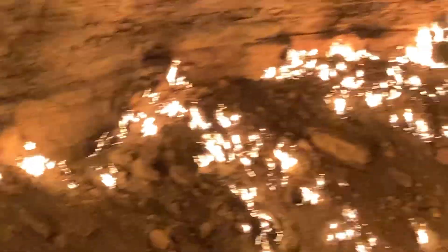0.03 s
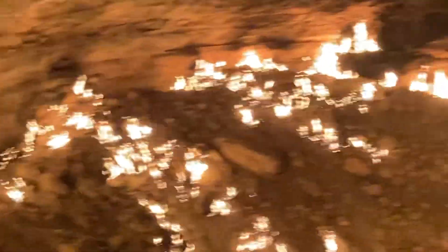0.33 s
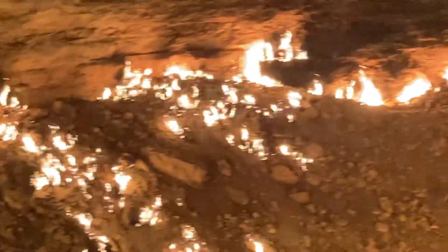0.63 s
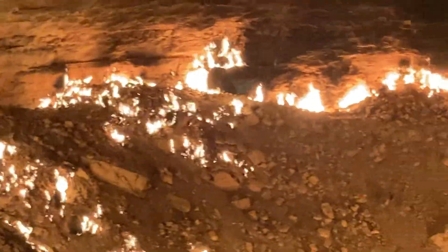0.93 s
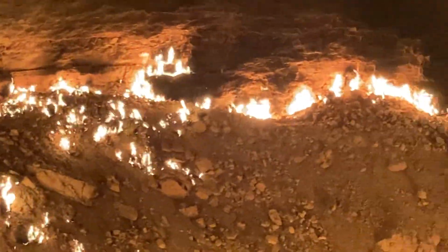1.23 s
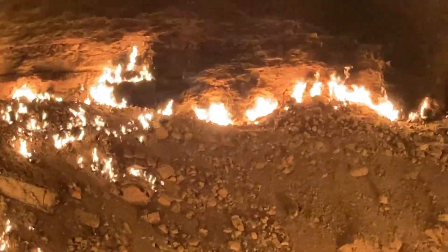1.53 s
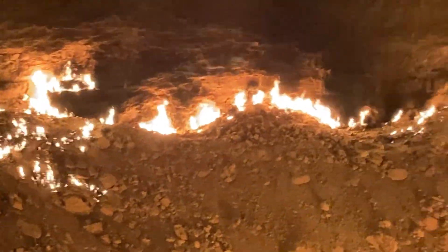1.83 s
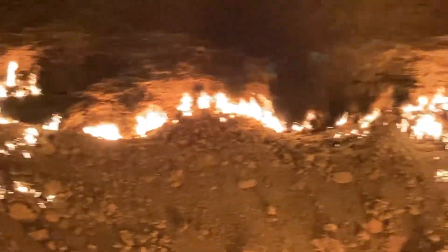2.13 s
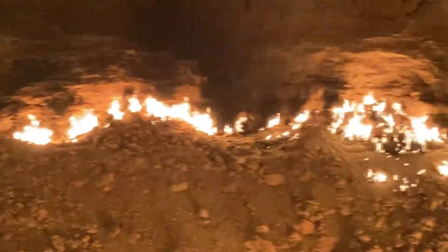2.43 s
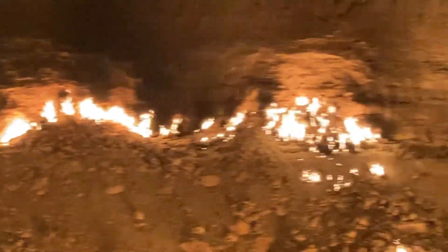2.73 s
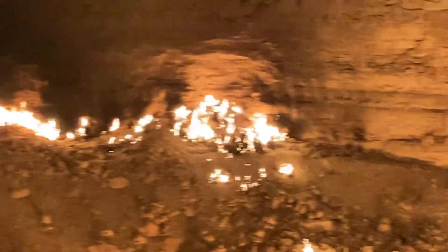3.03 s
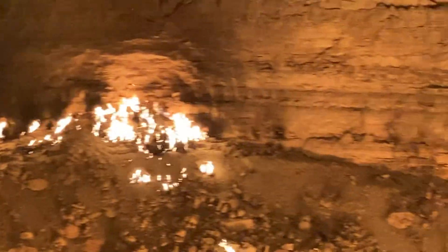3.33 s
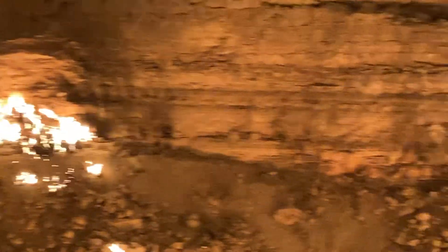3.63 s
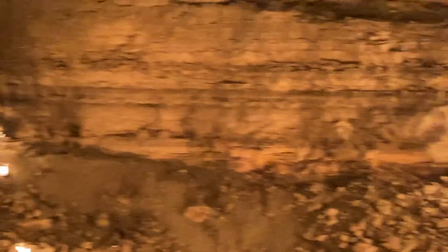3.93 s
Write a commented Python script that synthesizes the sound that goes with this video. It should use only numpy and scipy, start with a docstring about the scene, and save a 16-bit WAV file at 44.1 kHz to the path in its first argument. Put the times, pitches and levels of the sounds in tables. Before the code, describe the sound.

A steady low roar of burning gas, with soft wind thumps on the microphone.

```python
"""Gas seeps burn along a rocky slope at night. Turbulent combustion gives a steady, fluttering low
roar and a breathy rush above it, with short sizzling spurts, a fine crackle and a few faint ticks.
Light wind buffets the microphone with pressure fluctuations; its stronger puffs come through the
low cut, which delays the lows, as short thumps that fall in pitch. Behind it all lies a thin, steady
background hiss, louder at the opening."""
import sys
import numpy as np
from scipy import signal
from scipy.fft import rfft, irfft
from scipy.io import wavfile

SR = 44100
rng = np.random.default_rng(int(sys.argv[2]) if len(sys.argv) > 2 else 0)


def wav_record(signal):
    """Record a signal, one row per channel, as 16-bit PCM in the file named by sys.argv[1]."""
    frames = np.transpose(np.atleast_2d(signal))
    bounded = np.clip(frames, -1, 1)
    # unit amplitude maps onto the largest positive 16-bit level
    quanta = np.round(bounded * 32767).astype(np.int16)
    wavfile.write(sys.argv[1], SR, quanta)


N = 176400
TIME = np.arange(N) / SR
BIN_HZ = np.maximum(np.arange(N // 2 + 1) * SR / N, 1)

# Spectra of the flames' roar and rush: (frequency [Hz], relative spectral level [dB])
ROAR_SPECTRUM = [(20, -34.5), (30, -6.5), (45, 2), (62, 3.5), (90, -2.5), (130, -5.5), (200, -8),
                 (290, -11), (380, -14), (480, -18.5), (580, -25.5), (750, -25.5), (1000, -27.5),
                 (1400, -39.5), (2000, -45.5), (3000, -104), (6000, -94)]
RUSH_SPECTRUM = [(500, -20), (1100, 9.5), (1800, 5.5), (2300, 1), (3000, -2.5), (4000, -14), (5200, -14.5),
                 (8000, -37), (16000, -38.5)]
# Their envelopes: (time [s], relative level [dB])
ROAR_ENVELOPE = [(0, 4), (.2, 0.05), (.9, 3), (1.5, 2.3), (2.1, 0), (2.6, 1), (3.1, -1), (3.55, 2), (4, 0)]
RUSH_ENVELOPE = [(0, 10), (.3, 3.5), (.85, 2), (1.25, 1.5), (1.45, -1), (1.9, 4), (2.4, 6), (2.9, 6),
                 (3.35, 7.5), (3.75, 4.5), (4, 4.5)]
# Thin background hiss: (frequency [Hz], relative spectral level [dB])
HISS_SPECTRUM = [(1500, -32), (2400, -9), (3000, 7), (4000, 7.5), (5300, 2.5), (7200, 4.5), (9000, 3.5),
                 (11300, 5), (13500, -2.5), (15500, -8.5)]
# Its envelope, louder at the opening: (time [s], relative level [dB])
HISS_ENVELOPE = [(0, 24.5), (.05, 18.5), (.08, 15), (.15, 16), (.21, 8.5), (.245, 3), (1.5, 2.5), (2.7, 3),
                 (4, 2.5)]
# Stereo width of the steady noise; the microphone's stereo matrix alternates the treble in and
# out of phase: (frequency [Hz], correlation before clipping [1])
STEREO_CORRELATION = [(60, 0.12), (300, 0.71), (500, 1), (1000, 0.62), (1450, .4), (2050, -0.27),
                      (2600, -0.32), (3200, 0.14), (4000, 0.12), (5700, 0.012), (7200, 0.98), (9000, -1.81),
                      (11300, 0.99), (13700, -0.67), (15300, 0.58)]
# Level difference between the channels: (frequency [Hz], left minus right [dB])
STEREO_BALANCE = [(100, 2), (290, 8), (500, 0.5), (730, 7.5), (1250, 5.5), (1700, 5.5), (2200, 0.5),
                  (3000, 0), (4200, 1), (6000, 0)]
# Phase difference between the channels: (frequency [Hz], lead of the left channel [rad])
STEREO_PHASE = [(200, 0.038), (420, -0.61), (1100, -0.18), (1600, -1.4), (2100, 0.89), (3200, -1.6),
                (5000, 0.76)]
# Flares of single flames: (onset [s], duration [s], level [dB], centre [Hz], half-width [ln ratio])
FLAME_SPURTS = [(0, .23, -82, 3520, .24), (0.172, 0.044, -77, 3140, 0.2), (0.894, 0.13, -81, 1740, 0.52),
                (1.261, 0.027, -81.5, 3380, .27), (1.76, 0.13, -79.5, 1800, 0.2),
                (2.066, .28, -88, 3090, 0.31), (2.48, 0.044, -75, 1934, 0.53),
                (2.604, 0.084, -76, 1654, 0.41), (3.923, 0.04, -73, 1710, .25)]
# Wind on the microphone: (time [s], level [dB])
GUST_ENVELOPE = [(0, -37), (.03, -44), (.07, -54), (.58, -53), (.69, -48), (.76, -41.5), (.85, -52.5),
                 (.95, -51.5), (1.05, -38.5), (1.25, -52), (1.35, -45), (1.55, -52.5), (1.7, -43),
                 (1.81, -50), (1.9, -39.5), (2.0, -46), (2.15, -51.5), (2.3, -42), (2.42, -37), (2.5, -46),
                 (2.58, -31.5), (2.74, -37.5), (2.82, -47), (3.05, -42.5), (3.2, -54), (3.52, -39),
                 (3.58, -42.5), (3.68, -37.5), (3.73, -53.5), (3.82, -40.5), (3.92, -50), (4, -52.5)]
# Pressure of its eddies: (frequency [Hz], relative spectral level [dB])
EDDY_SPECTRUM = [(20, -31), (30, -18), (47, 4), (62, 6), (110, 2), (170, -8), (260, -12.5), (400, -28),
                 (700, -52.5), (1500, -67), (5000, -110)]
# Puffs that strike the microphone: (onset [s], peak level [dB], corner frequency [Hz])
WIND_PUFFS = [(.001, -31.5, 48), (.669, -38, 80.5), (0.956, -29, 45.3), (0.991, -26.5, 56),
              (1.026, -39.5, 44.6), (1.332, -37.5, 52), (1.745, -19.5, 64), (1.835, -24.5, 116),
              (1.846, -28, 44.7), (1.883, -31.5, 56), (1.926, -33, 66), (1.98, -33.5, 71),
              (2.266, -30.5, 49.8), (2.334, -28.5, 58), (2.389, -28.5, 130), (2.408, -34.5, 60.6),
              (2.540, -27, 140), (2.547, -18.5, 96), (2.557, -27.5, 42), (2.577, -29.5, 70),
              (2.604, -23, 34), (2.631, -28, 40), (2.649, -30.5, 79.2), (2.703, -28.5, 68.6),
              (2.727, -28.5, 49.8), (3.063, -40.5, 68.5), (3.498, -33, 141), (3.521, -35.5, 81.6),
              (3.636, -33.5, 100), (3.668, -32.5, 93), (3.755, -28, 88), (3.774, -27, 62),
              (3.84, -27.5, 48)]
# Ticks among the stones: (onset [s], peak level [dB], centre [Hz], T60 [s], half-width [ln ratio])
STONE_TICKS = [(1.906, -47, 1740, 0.01, 0.36), (2.572, -72.5, 2780, .05, .05),
               (2.753, -69.5, 7900, 0.0455, 0.14), (2.756, -63.5, 3370, .07, 0.039),
               (3.001, -65, 9400, .018, 0.42)]


def from_db(db):
    """Amplitude grows tenfold for every 20 dB."""
    return 10 ** (np.asarray(db) / 20)


def unit_rms(x):
    """Division by the RMS value gives unit power."""
    return x / np.sqrt(np.mean(x ** 2) + 1e-20)


def in_time(rows):
    """Linear interpolation gives a value at every sample."""
    return np.interp(TIME, *np.transpose(rows))


def in_frequency(rows):
    """Interpolation in log frequency gives a value at every bin."""
    hz, value = np.transpose(rows)
    return np.interp(np.log(BIN_HZ), np.log(hz), value)


def drift(corner_hz):
    """Low-passed noise is a slow random fluctuation, here of unit power."""
    return unit_rms(irfft(rfft(rng.standard_normal(N)) / (1 + (BIN_HZ / corner_hz) ** 2), N))


def noise_pair(correlation):
    """Sum and difference of independent noises give two partly correlated white spectra."""
    mid, side = rfft(rng.standard_normal((2, N)))
    correlation = np.clip(correlation, -.98, .98)
    return np.sqrt(1 + correlation) * mid + np.sqrt(1 - correlation) * side * [[1], [-1]]


def band_pass(x, hz, half_width):
    """Two band-pass filters in cascade double the steepness of the skirts."""
    edges = np.clip(hz * np.exp([-half_width, half_width]), 20, SR / 2 - 20)
    band = signal.butter(2, edges, "band", fs=SR, output="sos")
    return signal.sosfilt(band, signal.sosfilt(band, x + 1e-18))


def flutter(spectra, depth_db, rate_hz, shared):
    """Amplitude modulation: octaves swell and sink, partly together, partly alone; unit power."""
    out, together = 0, drift(rate_hz)
    octave = np.clip(np.log2(BIN_HZ / 60), 0, 7)
    for k in range(8):
        band = irfft(spectra * np.maximum(1 - abs(octave - k), 0), N)
        out = out + band * from_db(depth_db * (shared * together + drift(rate_hz)))
    return unit_rms(out)


def stereo_spectra(spectrum):
    """Correlation, level and phase between the channels set the stereo width of steady noise."""
    sides = np.array([[.5], [-.5]])
    pan = from_db(sides * in_frequency(STEREO_BALANCE))
    pan /= np.sqrt(np.mean(pan ** 2, axis=0))
    phase = np.exp(1j * sides * in_frequency(STEREO_PHASE))
    return noise_pair(in_frequency(STEREO_CORRELATION)) * pan * phase * from_db(in_frequency(spectrum))


def flames(flutter_hz=8.7):
    """Turbulent combustion radiates broadband noise: a low roar and the nearest flames' rush."""
    roar = flutter(stereo_spectra(ROAR_SPECTRUM), depth_db=1.5, rate_hz=flutter_hz, shared=.13)
    rush = flutter(stereo_spectra(RUSH_SPECTRUM), depth_db=2, rate_hz=flutter_hz, shared=.6)
    return (from_db(-47.5 + in_time(ROAR_ENVELOPE)) * roar
            + from_db(-78.5 + in_time(RUSH_ENVELOPE)) * rush)


def background_hiss():
    """The noise floor is a thin, steady hiss, louder at the opening."""
    return from_db(-89.5 + in_time(HISS_ENVELOPE)) * unit_rms(irfft(stereo_spectra(HISS_SPECTRUM), N))


def spurts(attack_s=.014, release_s=.012, roughness_db=2.3):
    """A flaring flame emits a band of noise, which rapid amplitude modulation makes rough."""
    out = 0
    jet = irfft(noise_pair(correlation=.3), N) * from_db(roughness_db * drift(corner_hz=61))
    for onset, duration, db, hz, half_width in FLAME_SPURTS:
        rise = np.clip((TIME - onset) / attack_s, 0, 1)
        fall = np.clip(1 - (TIME - onset - duration) / release_s, 0, 1)
        out = out + from_db(db) * rise * fall * unit_rms(band_pass(jet, hz, half_width))
    return out


def buffeting(correlation=.84, deep_hz=55, deep_octaves=.39):
    """Eddies press on the microphone as lumpy low noise; the largest come with the strongest gusts."""
    gust_db = in_time(GUST_ENVELOPE)
    eddy_spectra = noise_pair(correlation) * from_db(in_frequency(EDDY_SPECTRUM))
    eddies = flutter(eddy_spectra, depth_db=4, rate_hz=20, shared=.44)
    deep_band = np.exp(-.5 * (np.log2(BIN_HZ / deep_hz) / deep_octaves) ** 2)
    deep_eddies = unit_rms(irfft(noise_pair(correlation) * deep_band, N))
    deep_db = -29 + 2.12 * (gust_db - gust_db.max())
    return from_db(gust_db - .5) * eddies + from_db(deep_db) * deep_eddies


def crackle(spits_per_s=400, bands=10, bandwidth_hz=210):
    """Tiny spits form a Poisson process; each rings in a narrow band, and the level follows the rush."""
    out = 0
    for hz in np.geomspace(2000, 3540, bands):
        onsets = rng.random(N) < spits_per_s / bands / SR
        spits = onsets * rng.standard_normal((2, N))
        resonator = signal.iirpeak(hz, hz / bandwidth_hz, fs=SR)
        out = out + signal.lfilter(*resonator, spits + 1e-18)
    return from_db(-96 + in_time(RUSH_ENVELOPE)) * unit_rms(out)


def thump(corner_hz, low_cut_hz=72, dispersion_hz=57):
    """Group delay: the low cut holds back the lows of a soft pressure pulse, so its pitch falls."""
    pulse = signal.sosfilt(signal.butter(2, corner_hz, fs=SR, output="sos"), signal.unit_impulse(4096))
    pulse = signal.sosfilt(signal.butter(4, 3.14 * corner_hz, fs=SR, output="sos"), pulse)
    pulse = signal.sosfilt(signal.butter(4, low_cut_hz, "high", fs=SR, output="sos"), pulse)
    pole = np.exp(-2 * np.pi * dispersion_hz / SR)
    for _ in range(3):  # all-pass stages delay the lows further
        pulse = signal.lfilter([-pole, 1], [1, -pole], pulse)
    return pulse / abs(pulse).max()


def puffs(asymmetry=.082):
    """Each puff is a pressure pulse on both microphone ports, a little harder and sharper on one."""
    out = np.zeros((2, N + SR))
    for (onset, db, hz), side in zip(WIND_PUFFS, rng.choice([-1, 1], len(WIND_PUFFS))):
        port_factors = np.exp(asymmetry * side * np.array([1, -1]))
        pair = np.array([factor * thump(hz * factor) for factor in port_factors])
        start = int(onset * SR)
        out[:, start:start + pair.shape[1]] += from_db(db) * pair
    return out[:, :N]


def ticks(crack_to_noise=1.9):
    """A tick is a band-limited transient: an impulse, then exponentially fading noise."""
    out = np.zeros((2, N))
    for onset, db, hz, t60, half_width in STONE_TICKS:
        decay = (TIME >= onset) * np.exp(-np.log(1000) * np.maximum(TIME - onset, 0) / t60)
        burst = decay * rng.standard_normal((2, N))
        burst[:, int(onset * SR)] += crack_to_noise
        tick = band_pass(burst, hz, half_width)
        out += from_db(db) * tick / abs(tick).max()
    return out


def scene():
    """Superposition: fire, hiss and wind add linearly."""
    return flames() + background_hiss() + spurts() + buffeting() + crackle() + puffs() + ticks()


def record(dry):
    """A steep low-pass filter limits the bandwidth: 70 dB down from 16.7 kHz."""
    return signal.sosfilt(signal.cheby2(12, 70, 16700, fs=SR, output="sos"), dry)


dry = scene()
out = record(dry)
wav_record(out)
```